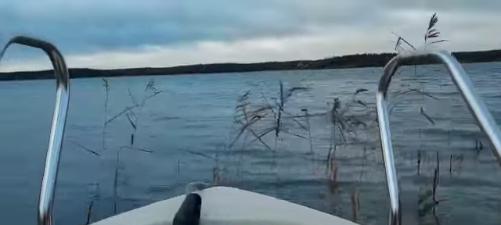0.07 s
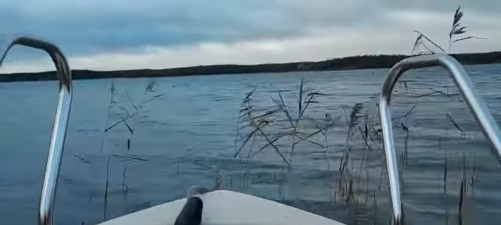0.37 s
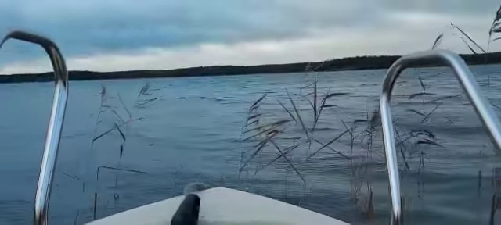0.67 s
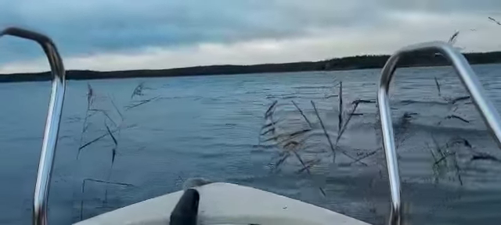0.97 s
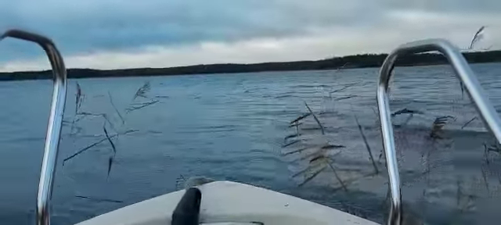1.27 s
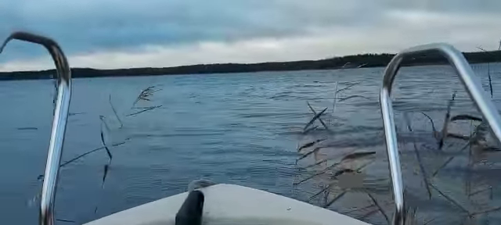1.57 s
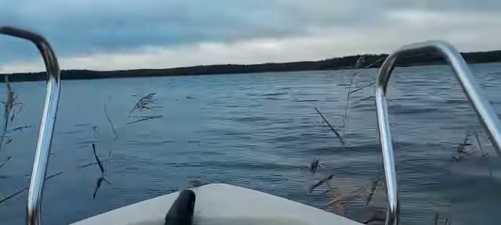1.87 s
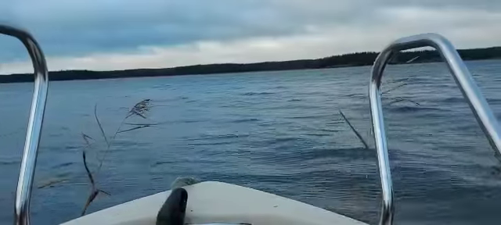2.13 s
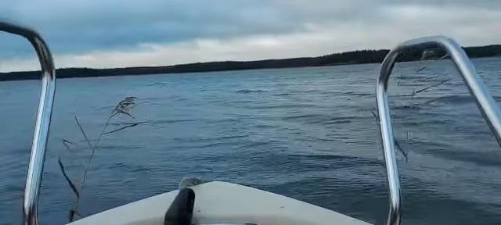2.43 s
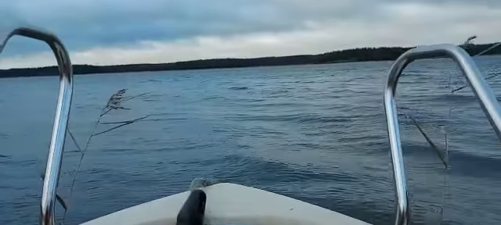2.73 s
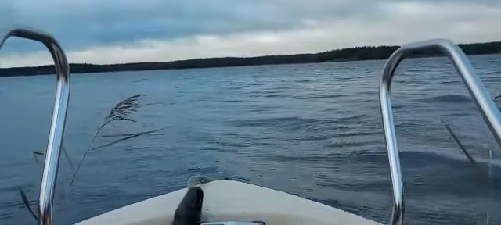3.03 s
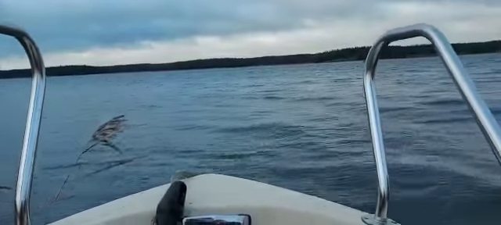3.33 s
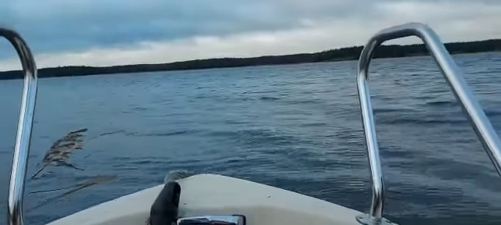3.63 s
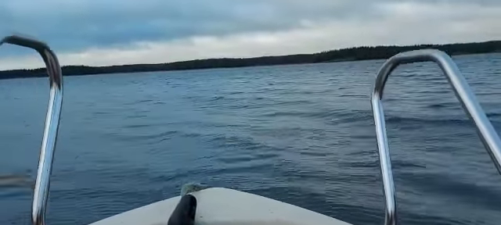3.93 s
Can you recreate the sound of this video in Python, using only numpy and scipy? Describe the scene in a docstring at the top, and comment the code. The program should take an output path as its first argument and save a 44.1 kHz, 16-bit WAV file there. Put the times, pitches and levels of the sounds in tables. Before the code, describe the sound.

Dry reeds hiss and knock against a small, droning hull as wavelets slap under the bow. The reeds fall away on the open lake, leaving softer lapping, light spray and wind buffeting the close microphone.

```python
"""On board a small boat, a stereo microphone close to hull and water, gliding out of a reed bed.
At first leaves hiss along the right side, and stems rub and knock on the hull, which drones.
Wavelets slap under the bow, and now and then an eddy of wind thumps one of the two microphone ports.
After two seconds the drone dies and the leaves fall away. Out on the open lake the lapping is softer,
wind buffets the left port and the bow throws spray."""
import sys
import numpy as np
from scipy import signal
from scipy.fft import rfft, irfft
from scipy.io import wavfile
from scipy.ndimage import uniform_filter1d

SR = 44100
rng = np.random.default_rng(int(sys.argv[2]) if len(sys.argv) > 2 else 0)


def inscribe(sig):
    """Save sig as 16-bit PCM at rate SR to the path in sys.argv[1].

    A 1-D sig is mono; a 2-D sig holds one channel per row.
    Samples are clipped to [-1, 1] before scaling.
    """
    pcm = np.round(np.clip(np.atleast_2d(sig).T, -1, 1) * 32767)
    wavfile.write(sys.argv[1], SR, pcm.astype(np.int16))


N = 176400
T = np.arange(N) / SR


def undb(db):
    return 10 ** (np.asarray(db) / 20)


def unit(x):
    """Scale to rms 1."""
    return x / np.sqrt(np.mean(x ** 2))


def curve(rows):
    """Gain that follows (s, dB) points."""
    return undb(np.interp(T, *np.array(rows).T))


def pan(db):
    """Stereo gains with the left db above the right."""
    return unit(undb(np.array([[db], [-db]]) / 2))


def shape(x, points):
    """Filter x by (Hz, dB) points."""
    hz, db = np.array(points).T
    f = np.fft.rfftfreq(N, 1 / SR) + 1
    return irfft(rfft(x) * undb(np.interp(np.log(f), np.log(hz), db)), N)


def colour(x, points):
    """Give x a (Hz, dB) spectrum, at rms 1."""
    return unit(shape(x, points))


def pair(likeness=0):
    """Stereo white noise with the given correlation."""
    mid, side = rng.standard_normal((2, N))
    return mid * np.sqrt((1 + likeness) / 2) + side * np.sqrt((1 - likeness) / 2) * np.array([[1], [-1]])


def cut(x, hz, kind, order=2):
    """Low-pass or high-pass."""
    return signal.sosfilt(signal.butter(order, hz, kind, fs=SR, output="sos"), x)


def ring(x, hz, width):
    """Pass x twice through one resonance, width in Hz, gain 1 at its centre."""
    b, a = signal.iirpeak(hz, hz / width, fs=SR)
    return signal.lfilter(b, a, signal.lfilter(b, a, x))


def walk(per_s):
    """Smooth random wander at rms 1."""
    k = int(SR / per_s)
    steps = np.repeat(rng.standard_normal(N // k + 1), k)
    return unit(uniform_filter1d(uniform_filter1d(steps, k), k)[:N])


def swells(rows):
    """Bell-shaped swells from (s, half length, dB) rows."""
    return sum(undb(db) * np.exp(-((T - s) / half) ** 2 / 2) for s, half, db in rows)


def burst(rise, decay):
    """Half-second envelope of a blow, peak 1; rise and decay in seconds."""
    t = T[:N // 8]
    envelope = (1 - np.exp(-t / rise)) * np.exp(-t / decay)
    return envelope / envelope.max()


def swing(s, hz, decay_radians=1.76):
    """One short swing of pressure centred on time s, peak 1."""
    phase = 2 * np.pi * hz * (T - s)
    x = np.sin(phase) * np.exp(-np.minimum(np.hypot(phase, 1) / decay_radians, 20))
    return x / abs(x).max()


def add(out, s, x):
    """Mix x into out from time s."""
    i = int(np.clip(s * SR, 0, N - 1))
    out[..., i:i + x.shape[-1]] += x[..., :N - i]


def bubble(hz, decay_cycles=11.5, glide_per_s=3.4):
    """A wobbling bubble rings briefly and rises in pitch."""
    t = T[:N // 40]
    wobble = unit(cut(rng.standard_normal(len(t)), 210, "low"))
    pitch = hz * (1 + glide_per_s * t + 0.034 * wobble)
    return burst(0.0012, decay_cycles / hz)[:len(t)] * np.sin(2 * np.pi * np.cumsum(pitch) / SR)


def lapping(bubbles_per_s=230, bubble_hz=1398):
    """Water laps all round, stronger among the reeds, with small bubbles and a few clear plops."""
    # Spectrum of the lapping. Each row: frequency in Hz, relative level in dB.
    lake = [(60, -12), (250, -2), (600, 3.5), (1000, -8), (1700, -2), (2300, -7.5), (3200, -12.5),
            (5500, -16.5), (7000, -15.5), (8500, -22.5), (13000, -15), (15700, -25.5)]
    # Single clear bubbles. Each row: start in seconds, peak in dB, starting pitch in Hz.
    plops = [(0.916, -46.5, 1385), (1.02, -49.5, 1480), (2.722, -44.5, 1560), (3.222, -45.5, 1066),
             (3.234, -49, 1240), (3.937, -48.5, 1260)]
    in_reeds = np.interp(T, [2, 3.3], [1, 0])
    out = colour(pair(likeness=-0.34), lake) * undb(-56 + 3.5 * in_reeds + 1.8 * walk(27))
    for when, faintness, pitch, side in rng.random((int(bubbles_per_s * N / SR), 4)):
        db = -69.5 - 3.5 * np.log(max(faintness, .05))
        hz = bubble_hz * 2 ** (2 * pitch - 1)
        add(out, when * N / SR, undb(db) * bubble(hz) * pan(20 * (side - .5)))
    for s, db, hz in plops:
        add(out, s, undb(db) * bubble(hz))
    return out


def spray(scatter=0.57, flutter_db=2):
    """Each splash off the bow swells and scatters fine drops that patter back in clusters."""
    # Splashes. Each row: start in seconds, level in dB, rise and decay in seconds before squaring.
    splashes = [(2.58, -53.5, 0.15, 0.28), (3.11, -43.5, 0.051, 0.033), (3.679, -48.5, 0.3, 0.15)]
    # Spectrum of the drops. Each row: frequency in Hz, relative level in dB.
    patter = [(400, 9), (900, 3), (1700, 4), (3000, -4.5), (5000, -8), (7000, -9.5), (9000, -16),
              (13000, -12.5), (15700, -15)]
    flow = np.zeros(N)
    for s, db, rise, decay in splashes:
        add(flow, s, undb(db) * burst(rise, decay) ** 2)
    drops = pair() * np.exp(scatter * pair(likeness=1)) * undb(flutter_db * walk(160))
    return colour(drops, patter) * flow


def wind(wake_db=-12.5):
    """Each eddy thumps one microphone port and leaves a churning wake; gusts blow on the windward left."""
    # Eddies. Each row: centre in seconds, peak in dB, pitch in Hz, port (0 left, 1 right).
    eddies = [(.340, -2.5, 191, 1), (0.349, -14, 131, 1), (1.053, -12.5, 88, 1), (1.219, -14, 204, 0),
              (1.28, -8, 123, 0), (1.288, -4, 205, 0), (1.908, -14, 151, 1), (2.492, -14, 149, 0),
              (2.507, -14, 105, 0), (2.532, -14, 188, 0), (2.686, -11.5, 196, 0), (2.715, -9.5, 190, 0),
              (2.787, -8, 335, 0), (2.792, -12, 141, 0), (2.802, -13, 109, 0), (2.861, -6, 244, 0),
              (2.87, -12.5, 121, 0), (2.877, -20, 210, 0), (2.888, -13, 195, 0), (2.99, -14, 160, 0),
              (3.028, -18.5, 238, 0), (3.119, -9.5, 170, 0), (3.193, -20, 144, 0)]
    # Gusts. Each row: peak time and half length in seconds, level in dB.
    gusts = [(1.22, 0.058, -22), (2.52, 0.04, -20), (2.78, 0.08, -23.5), (3.04, 0.063, -26.5),
             (3.18, 0.022, -22.5)]
    # Spectrum of the churning air. Each row: frequency in Hz, relative level in dB.
    turbulence = [(20, -34), (60, 4), (125, -1.5), (250, -11), (450, -27.5), (900, -40), (2000, -97)]
    out, churn = np.zeros((2, N)), colour(pair(), turbulence)
    for s, db, hz, port in eddies:
        wake = np.zeros(N)
        add(wake, s, burst(rise=0.0019, decay=0.0086))
        out[port] += undb(db) * (swing(s, hz) + undb(wake_db) * wake * churn[port])
    out[0] += churn[0] * swells(gusts)
    return cut(out, 850, "low")


def slaps(likeness=0.57, hollow_db=1.5):
    """Wavelets trap a pocket of air under the bow and ring the hollow there; some bump the hull."""
    # Slaps. Each row: start in seconds, level in dB, rise and decay in seconds, pocket pitch in Hz.
    wavelets = [(0.092, -41.5, .003, 0.028, 810), (0.258, -38, .002, 0.11, 462),
                (0.589, -29, 0.0012, 0.036, 473), (.645, -41.5, 0.021, 0.045, 610),
                (.91, -43.5, 0.017, 0.071, 570), (1.485, -36.5, 0.0016, .03, 700),
                (2.03, -41, 0.0027, .04, 855), (2.195, -43.5, 0.052, 0.049, 640),
                (2.446, -35, 0.0016, 0.048, 684), (2.658, -38, 0.0017, 0.026, 750),
                (2.875, -43, 0.011, 0.061, 550), (3.114, -34.5, 0.0056, 0.054, 470),
                (3.602, -49, .002, 0.031, 746), (3.653, -35, 0.0014, 0.055, 663),
                (3.725, -37.5, 0.0022, 0.11, 270), (3.765, -41, .03, 0.064, 735)]
    # Resonances under the bow. Each row: frequency and half width in Hz, relative gain in dB.
    hollow_modes = [(132, 24, 6.5), (240, 24, 5), (353, 38, 3.5), (426, 27, 1.5), (564, 43, 2),
                    (719, 79, -8)]
    # Waves bumping the hull. Each row: centre in seconds, peak in dB, pitch in Hz.
    bumps = [(0.596, -17, 298), (0.608, -17, 229), (1.503, -23, 172), (3.73, -25.5, 219)]
    out, water = np.zeros((2, N)), pair(likeness)
    hollow = unit(sum(undb(db) * ring(water, hz, 2 * half) for hz, half, db in hollow_modes))
    for s, db, rise, decay, hz in wavelets:
        envelope = burst(rise, decay)
        pocket = unit(ring(pair(likeness), hz, width=0.43 * hz))
        body = np.roll(pocket + undb(hollow_db) * hollow, -int(s * SR), axis=1)[:, :len(envelope)]
        add(out, s, undb(db) * unit(envelope * body) * np.sqrt(np.mean(envelope ** 2)))
    thuds = sum(undb(db) * swing(s, hz) for s, db, hz in bumps)
    return cut(out, 890, "low", order=6) + thuds


def knocks(crack_db=-15):
    """Hollow stems strike the side: a short woody ring with a bright crack."""
    # Stem strikes. Each row: start in seconds, level in dB, pitch and width in Hz,
    # decay in seconds, left over right in dB.
    strikes = [(0.091, -41, 1580, 1310, 0.018, 2), (0.26, -42.5, 2220, 550, 0.012, -4),
               (.590, -48, 1290, 900, 0.031, 2), (0.823, -49.5, 1660, 900, 0.018, -1),
               (1.18, -51.5, 1900, 900, 0.03, -3), (1.427, -48, 2050, 1200, 0.014, -2),
               (1.488, -36, 1650, 1300, 0.015, -4.5), (1.827, -45.5, 1700, 915, 0.013, -6),
               (2.032, -43.5, 1110, 600, 0.012, 3), (2.109, -43.5, 2540, 500, 0.012, -3),
               (2.562, -55, 3800, 3060, .008, -6), (2.608, -46.5, 1350, 800, .025, 2),
               (2.659, -39.5, 1074, 650, 0.014, -1), (2.716, -50.5, 2250, 1200, 0.014, -3),
               (2.937, -48, 1450, 2000, 0.0095, -1), (3.654, -57, 3300, 2000, 0.0088, -2),
               (3.897, -49, 2300, 1300, 0.016, -2)]
    out = np.zeros((2, N))
    for s, db, hz, width, decay, pan_db in strikes:
        envelope = burst(0.00061, decay)
        scrape = rng.standard_normal((2, len(envelope)))
        wood = unit(ring(scrape, hz, width))
        crack = unit(cut(cut(scrape, 8100, "low"), 1050, "high"))
        add(out, s, undb(db) * envelope * (wood + undb(crack_db) * crack) * pan(pan_db))
    return out


def hull(flutter_db=0.5):
    """Stems and water shake the hull; rubbing stems make its two lowest modes sing unsteadily."""
    # Spectrum of the hull's body. Each row: frequency in Hz, relative level in dB.
    body = [(20, -29), (45, -3), (70, 0.5), (120, 4), (185, -10), (245, -8), (330, -14.5), (450, -23),
            (700, -34), (1100, -65.5), (3000, -63)]
    # Course of the rumble. Each row: time in seconds, level in dB.
    rubbing = [(0, -26.5), (.3, -27.5), (.6, -25), (1.15, -28.5), (1.45, -29), (1.9, -30), (2.2, -31.5),
               (2.45, -35), (2.7, -31.5), (2.9, -46.5), (3.25, -42), (3.48, -57), (3.65, -53.5), (3.8, -40),
               (4, -49.5)]
    # The two modes. Each row: frequency in Hz, relative level in dB, wander in Hz.
    modes = [(70.1, -4.5, 0.67), (141.1, 2, 0.65)]
    # Course of the drone. Each row: time in seconds, level in dB.
    drive = [(0, -53), (.28, -34), (.42, -26), (.6, -39.5), (.95, -38), (1.25, -39.5), (1.5, -45.5),
             (1.68, -27), (1.9, -37.5), (2.05, -67), (2.5, -61), (4, -59)]
    rumble = colour(pair(likeness=0.71), body) * curve(rubbing)
    drone = np.zeros(N)
    for hz, db, wander in modes:
        gain = undb(db - flutter_db * walk(11.64))
        pitch = hz + wander * walk(15)
        drone += gain * np.sin(2 * np.pi * np.cumsum(pitch) / SR)
    return rumble + np.sqrt(2) * drone * curve(drive)


def leaves(ticks_per_s=12000, scatter=0.11, flutter_db=1.15):
    """Dry leaves catch and slip close on the right in thousands of tiny ticks; some edges squeak."""
    # Leaves sliding on the hull. Each row: time in seconds, level in dB.
    brushing = [(0, -45), (.04, -45), (.07, -39.5), (.14, -41), (.22, -46.5), (.27, -41.5), (.55, -43.5),
                (.68, -43), (.79, -45.5), (.91, -42.5), (.98, -49.5), (1.27, -48.5), (1.52, -51),
                (1.7, -43.5), (1.83, -41), (2.02, -48.5), (2.23, -54.5), (2.4, -59.5), (2.66, -58),
                (2.74, -55), (2.84, -57.5), (3.1, -59.5), (3.5, -71), (4, -65)]
    # Spectrum of the hiss. Each row: frequency in Hz, relative level in dB.
    spectrum = [(1500, -8), (3000, -12.5), (5400, -13), (7100, -5.5), (8500, -12.5), (10500, -5),
                (13300, -0.5), (15700, 0.5)]
    # Squeaking edges. Each row: peak time and half length in seconds, level in dB, pitch in Hz.
    squeaks = [(.45, 0.22, -49, 13700), (.78, 0.046, -46, 13400), (1.273, 0.032, -56, 11600),
               (1.82, 0.24, -55, 13200), (2.15, 0.041, -54.5, 11700), (2.21, .04, -57, 13400),
               (2.28, 0.035, -55, 14100)]
    # The boat shades the left port from the leaves. Each row: frequency in Hz, gain in dB.
    shade = [(3000, -2.5), (7000, -6.5), (10000, -2.5), (14000, -10.5)]
    catches = rng.random((2, N)) < ticks_per_s / SR
    ticks = catches * pair() * np.exp(scatter * pair())
    hiss = colour(ticks, spectrum) * curve(brushing)
    for s, half, db, hz in squeaks:
        hiss += unit(ring(pair(), hz, width=1200)) * swells([(s, half, db)])
    left, right = np.sqrt(2) * hiss * undb(flutter_db * walk(45.2))
    return np.array([shape(left, shade), right])


def scene():
    """Reeds, boat and wind from on board, with lapping and spray a little to the right."""
    return leaves() + hull() + wind() + slaps() + knocks() + (lapping() + spray()) * pan(-1.5)


def record(dry, bass_hz=30, top_hz=15750):
    """The recorder thins the deepest bass and cuts the top steeply."""
    thin = cut(dry, bass_hz, "high")
    return signal.sosfilt(signal.ellip(12, .2, 80, top_hz, fs=SR, output="sos"), thin)


dry = scene()
out = record(dry)
inscribe(out)
```